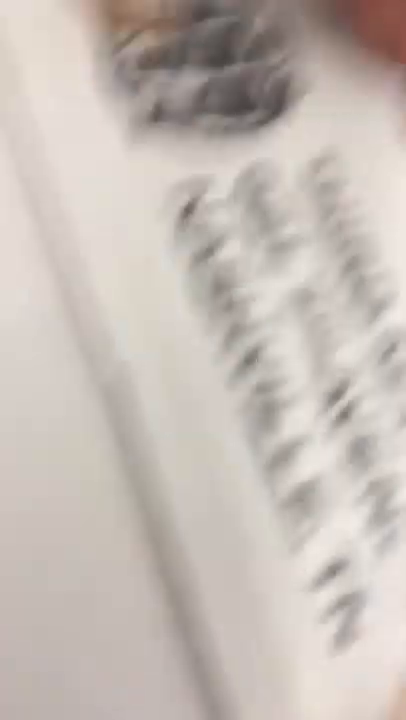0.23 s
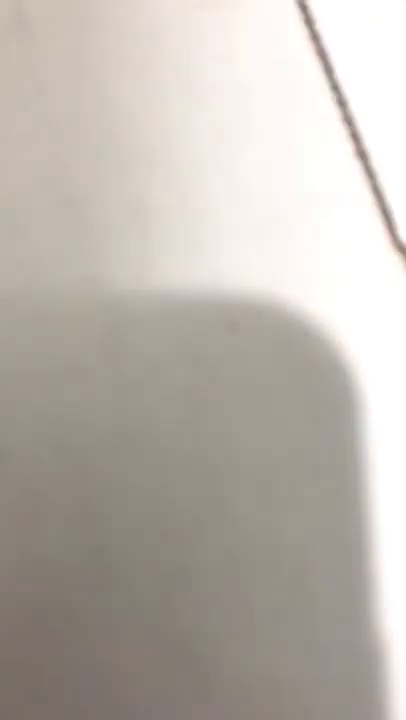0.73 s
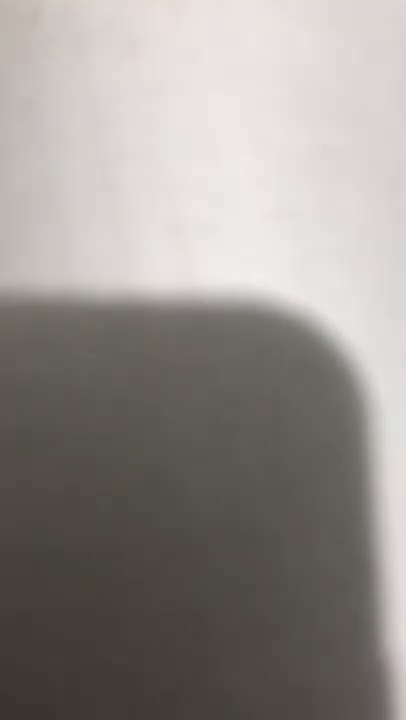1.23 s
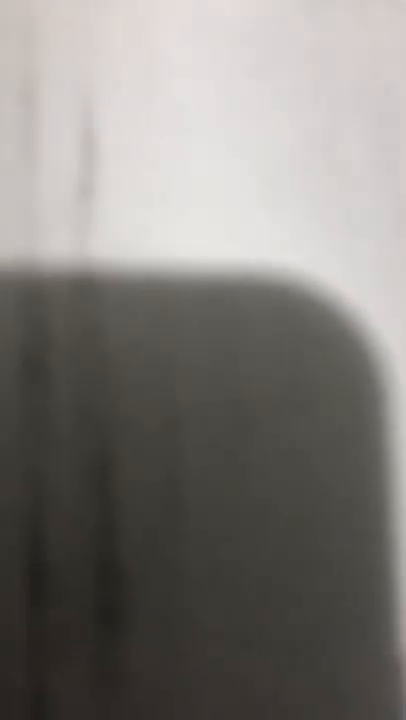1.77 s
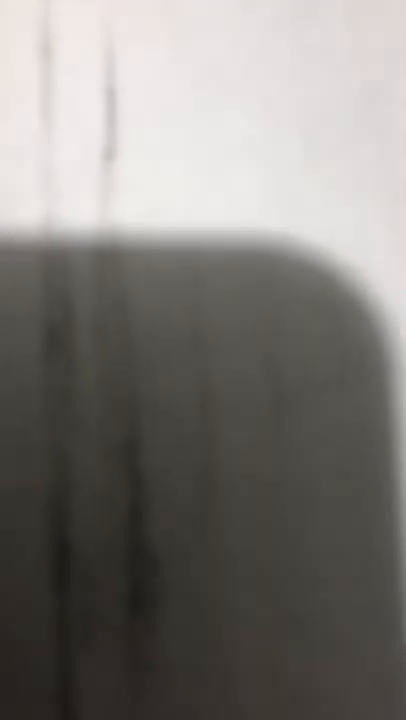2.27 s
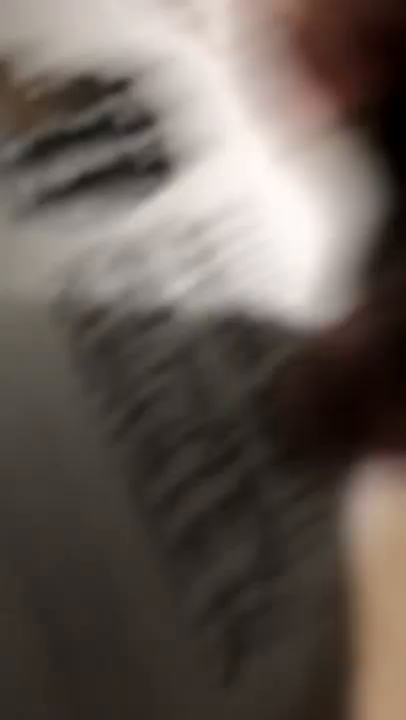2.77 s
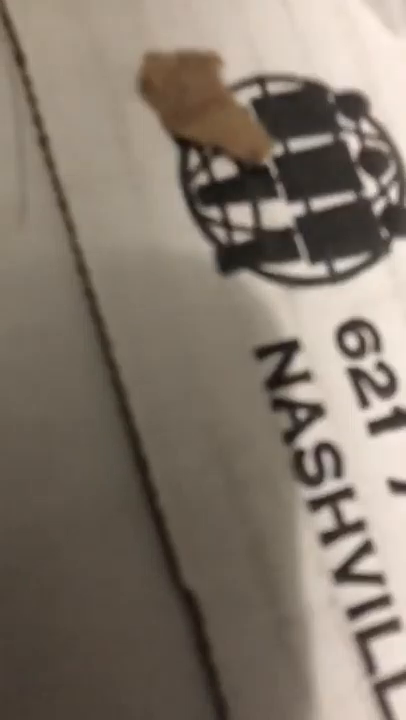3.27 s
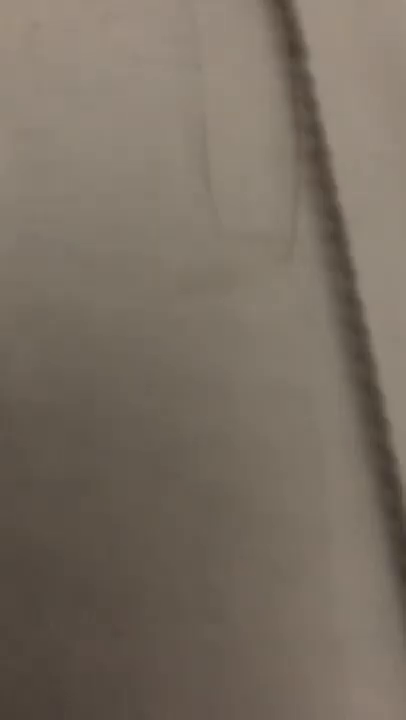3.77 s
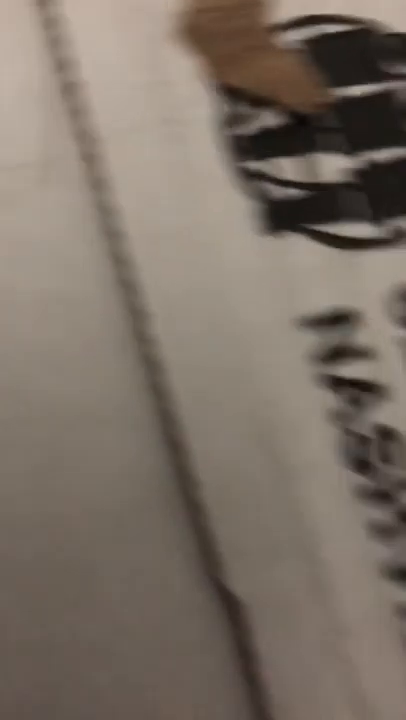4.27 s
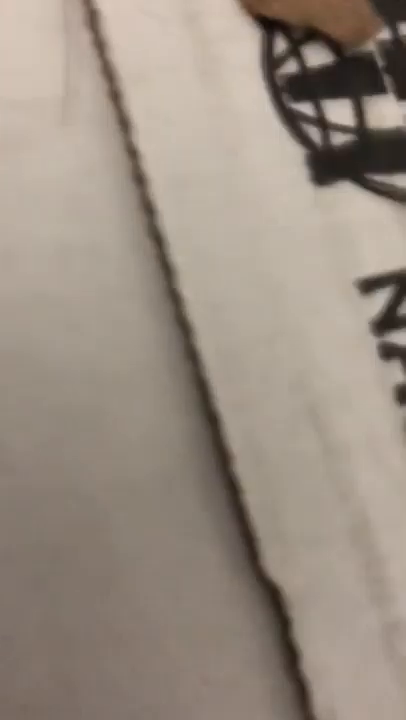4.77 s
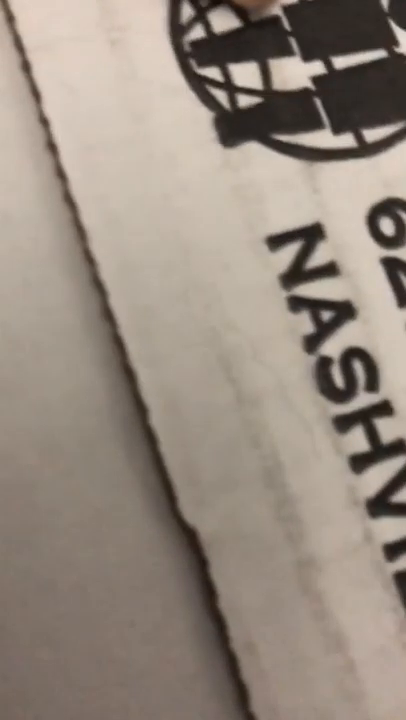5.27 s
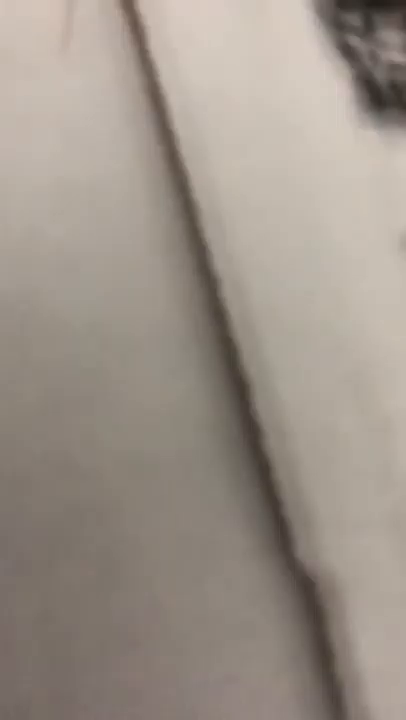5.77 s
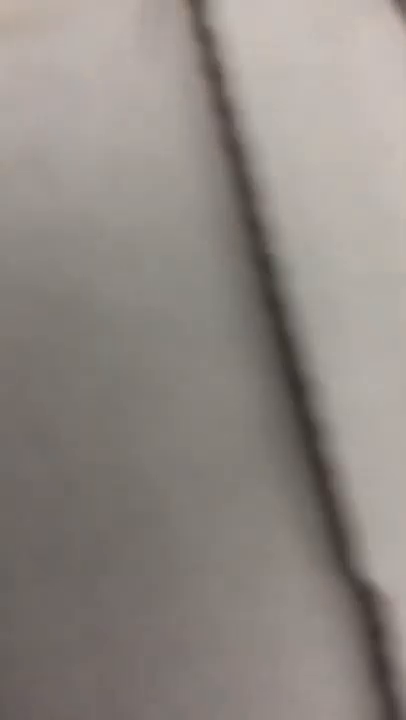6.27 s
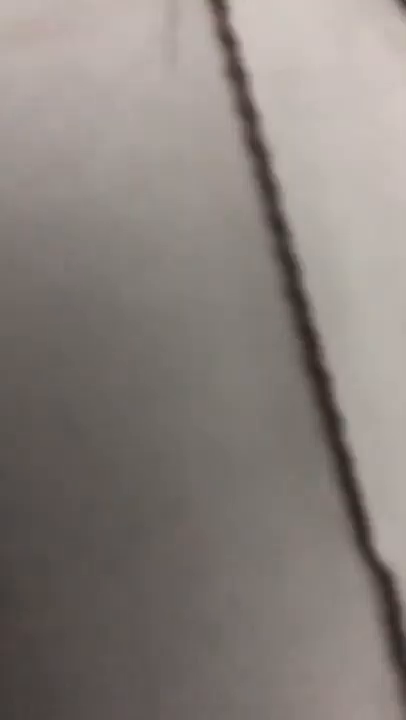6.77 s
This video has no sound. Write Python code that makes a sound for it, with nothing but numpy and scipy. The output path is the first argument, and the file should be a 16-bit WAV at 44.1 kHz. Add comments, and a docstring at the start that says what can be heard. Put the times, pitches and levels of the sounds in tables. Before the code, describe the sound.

Close handling of a cardboard mailer in a small, dry room, over faint steady low-weighted noise. From 0 to 1.3 s fingers scrape softly on card, with a tiny high squeak at 0.1, a low thump at 0.3, dull pops and creaking folds; a very short mid-pitched squeak comes at 1.35. From 1.4 to 2.5 s heavy, hollow thumps dominate, strongest near 1.55, 1.9 and 2.15, mixed with snapping flutes. A loud crack at 2.96 starts the tearing: brief fizzing, crunching rips near 3.1, 3.55 and 3.8 with deep thumps, then a quieter gap with a faint squeak around 4.15. Short pulls rip at 4.5 and 4.8, with cracks and a low rumble. After a lull, creases snap around 5.5 and stronger rips run from 5.6 to 6.8 s, increasingly thin and papery, each with a low panel recoil, then low rumble to about 7 s.

```python
"""A cardboard mailer box is gripped, bent and torn open by hand, close by in a small room.
First fingers rub over the held, rumbling card, with a squeak, dull panel thumps and snapping creases;
from about 3 s the glued flap rips in pulls, fizzing and crunching, and later hangs free and sounds thinner.
Blows and fibre grains cross the card as bending waves, treble first and bass last: short falling chirps.
The squeaks are wavering sine tones, and the steady background is coloured noise."""
import sys
import numpy as np
from scipy import signal
from scipy.fft import rfft, irfft
from scipy.io import wavfile
from scipy.ndimage import uniform_filter1d, minimum_filter1d

SR = 44100
rng = np.random.default_rng(int(sys.argv[2]) if len(sys.argv) > 2 else 0)


def to_wav(sig):
    """Store sig (one row per channel, or 1-D mono) as 16-bit WAV at the path in sys.argv[1].

    Samples outside -1..1 are clipped; the rate is SR.
    """
    pcm = np.clip(np.atleast_2d(sig), -1, 1) * 32767
    pcm = np.round(pcm).astype(np.int16)
    wavfile.write(sys.argv[1], SR, pcm.T)  # frames by channels


N = 309008
TAPS = 4096  # samples in one bending wave
HZ = np.fft.rfftfreq(TAPS, 1 / SR)
TIME = np.arange(N) / SR

# Spectrum of the dull body of a snap, also of the creaking flutes.
# Each row: frequency in Hz, relative level in dB.
SNAP_BODY = [(150, -14.5), (450, -2), (850, 0.5), (1300, 1.5), (1650, -4), (2000, -18.5), (4500, -87)]
# Pulls that rip the paper. Each row: start in seconds, length in seconds, relative level in dB,
# change by the end in dB, ring of the box against the fizz in dB, relative recoil of the panel in dB.
PULLS = [(3.054, 0.068, -33.5, 8, 4, -23.5), (3.53, 0.017, -30.5, -10, 4.5, -34),
         (3.591, 0.038, -28, -10, -1.5, -24), (3.789, 0.059, -24, -12.5, 1.5, -40),
         (3.971, 0.007, -37.5, -7.5, 2, -13.5), (4.475, 0.0078, -15.5, -6, -0.5, -18.5),
         (4.524, 0.043, -23, -2, 4, -10.5), (4.699, 0.044, -37, 6, 0.5, -18),
         (4.777, 0.063, -22, -2.5, 1.5, -28), (5.232, 0.044, -45, 7.5, 8.5, -37),
         (5.562, 0.029, -35, 12.5, 4, -17.5), (5.627, 0.044, -14.5, -1.5, 1.5, 1.5),
         (5.834, 0.036, -19.5, 8.5, 3, 1), (5.909, 0.088, -17, -3.5, 2.5, -1),
         (6.123, 0.0014, -30, 25, 4.5, 1.5), (6.265, 0.097, -21.5, 0.5, 4.5, -3),
         (6.455, 0.2, -20.5, -7, 1, -3), (6.707, 0.069, -22.5, 3.5, 5, -2)]
CATCH_S = .05  # rough spacing of the surges in a pull
CATCH_HALF_S = 0.0079  # half length of one surge, also the attack of the shaking
RECOIL_LAG_S = 0.0175  # from a surge to the panel springing back


def gain_of(db):
    """Decibels to amplitude."""
    return 10 ** (np.asarray(db) / 20)


def evened(x):
    """Scales to rms 1."""
    return x / np.sqrt(np.mean(x ** 2) + 1e-20)


def colour(points, hz=HZ):
    """Gain of a spectrum table, joined on a log-frequency axis and rolled off below 30 Hz."""
    f, db = np.transpose(points)
    curve_db = np.interp(np.log(hz + 1), np.log(f), db)
    return gain_of(curve_db) * hz ** 2 / (hz ** 2 + 30 ** 2)


def level(curve):
    """Gain of a (s, dB) curve at every sample."""
    return gain_of(np.interp(TIME, *np.transpose(curve)))


def wander(hz):
    """Smooth chance of rms 1 that changes about hz times a second."""
    f = np.fft.rfftfreq(N, 1 / SR)
    return evened(irfft(rfft(rng.standard_normal(N)) / (1 + (f / hz) ** 4), N))


def swell(start, length, attack_s, release_s):
    """Gain that grows up to start, holds for length and dies away."""
    before = (start - TIME) / attack_s
    after = (TIME - start - length) / release_s
    return np.exp(-np.clip(np.maximum(before, after), 0, 30))


def below(x, hz):
    """The part of a sound under hz, without delay."""
    return signal.sosfiltfilt(signal.butter(2, hz, fs=SR, output="sos"), x)


def add(mix, start, sound):
    """Mixes a sound in from a sample index on."""
    part = mix[max(start, 0):][:len(sound)]
    part += sound[:len(part)]


def uneven(db):
    """Gain of one spot on the card: its own peaks and dips, a few hundred Hz apart."""
    ripple = uniform_filter1d(uniform_filter1d(rng.standard_normal(len(HZ)), size=17), size=13)
    return gain_of(db * evened(ripple))


def bending_wave(gain, travel_s):
    """A blow after crossing the card, energy 1: delayed by travel_s at 1 kHz, as 1 / sqrt(frequency)."""
    turns = 2 * travel_s * np.sqrt(1000 * HZ)
    wave = irfft(gain * np.exp(-2j * np.pi * turns))
    wave = np.roll(wave, TAPS // 16)  # room for the onset
    wave = wave * np.interp(np.arange(TAPS) / TAPS, [0, .04, .7, 1], [0, 1, 1, 0])
    return wave / np.linalg.norm(wave)


def summit(wave):
    """Sample index at which a wave is strongest."""
    return int(np.argmax(abs(signal.hilbert(wave))))


def grains(gain, effort, per_s, spread_db, travel_s, count=11):
    """Many tiny blows of uneven size, scaled by effort, from a spot that creeps across the card."""
    struck = rng.random(N) < per_s / SR
    size = struck * gain_of(spread_db * np.minimum(rng.exponential(1, N), 3))
    blows = evened(size * rng.choice([-1, 1], N)) * effort
    place = (22 * TIME + 2 * rng.random(N)).astype(int) % count  # 22 spots a second, overlapping
    out = np.zeros(N)
    for k in range(count):
        wave = bending_wave(gain * uneven(3.5), travel_s * rng.uniform(.5, 1.5))
        out += signal.oaconvolve(blows * (place == k), wave)[summit(wave):][:N]
    return out


def catches():
    """A pull catches and surges at even spacing: (s, level dB, ring dB, recoil dB) of every surge."""
    surges = []
    for start, length, db, change_db, box_db, recoil_db in PULLS:
        for u in np.linspace(0, 1, round(length / CATCH_S) + 1):
            surges.append((start + u * length, db + u * change_db, box_db, recoil_db))
    return surges


def sliding(slide_db=5, hiss_hz=2800):
    """Skin catches and slips on the paper grain in uneven scrapes, each stroke with its share of hiss."""
    # Strokes of the fingers. Each row: start in seconds, length in seconds, relative level in dB,
    # hiss against the rub in dB.
    strokes = [(0, 0.01, -33.5, -4), (0.103, 0.059, -40.5, 2.5), (0.276, 0.059, -35.5, -1),
               (0.466, 0.2, -42, -1), (1.005, 0.045, -44, 3.5), (1.7, 0.1, -48, 1), (2.724, 0.21, -38, -2),
               (3.218, 0.11, -50, 2.5)]
    # Spectrum of skin on card. Each row: frequency in Hz, relative level in dB.
    rub_spectrum = [(200, 5.5), (800, -0.5), (1650, 4), (2200, -8.5), (4000, -6.5), (5800, -11.5),
                    (7700, -22.5), (16000, -29)]
    attack_s, release_s = 0.029, 0.045
    unevenness = gain_of(3 * wander(hz=60))
    scrape = grains(colour(rub_spectrum), unevenness, per_s=5000, spread_db=3.2, travel_s=.003)
    rub = below(scrape, hiss_hz)
    hiss = scrape - rub
    out = np.zeros(N)
    for start, length, db, hiss_db in strokes:
        effort = gain_of(db) * swell(start, length, attack_s, release_s)
        out += effort * (rub + gain_of(hiss_db) * hiss)
    return gain_of(slide_db) * out


def flexing(flex_db=3.0, shut_hz=118, open_hz=64, octaves=0.66, creak_db=-17.0):
    """The held box rumbles with many small buckles, deeper as it turns slack; its flutes creak along."""
    # How hard the hands work the box. Each row: time in seconds, relative level in dB.
    grip = [(0, -27), (2.6, -25.5), (3.12, -28), (3.4, -31.5), (4.15, -38.5), (4.65, -18.5), (5.05, -35),
            (7, -29.5)]
    shake_db, shake_release_s = -11, 0.033  # rumble left by a pull, relative to its recoil
    shaken = np.zeros(N)
    for start, length, *_, recoil_db in PULLS:
        shake = swell(start + RECOIL_LAG_S, length, CATCH_HALF_S, shake_release_s)
        shaken += gain_of(recoil_db + shake_db) * shake
    effort = np.hypot(level(grip), shaken)
    slack = np.interp(TIME, [2.7, 5.6], [.3, .9])
    rumble = np.zeros(N)
    for hz, share in (shut_hz, 1 - slack), (open_hz, slack):
        panel = np.exp(-.5 * (np.log2((HZ + 1) / hz) / octaves) ** 2)
        rumble += grains(panel, effort * np.sqrt(share), per_s=105, spread_db=2.4, travel_s=.004)
    creak = grains(colour(SNAP_BODY), effort, per_s=110, spread_db=4.8, travel_s=.004)
    return gain_of(flex_db) * rumble + gain_of(creak_db) * creak


def room_tone(tone_db=-40):
    """Steady indoor background: noise shaped by a fixed spectrum."""
    # Spectrum of the background. Each row: frequency in Hz, relative level in dB.
    tone_spectrum = [(30, 8), (180, 3), (400, -7), (1600, -15), (2500, -33), (4200, -25), (7000, -36.5),
                     (16000, -48)]
    noise = rfft(rng.standard_normal(N)) * colour(tone_spectrum, np.fft.rfftfreq(N, 1 / SR))
    return gain_of(tone_db) * evened(irfft(noise, N))


def squeaks(waver=0.011):
    """Card on card: stick and slip so regular that it becomes a short, wavering tone."""
    # Each row: centre in seconds, half length in seconds, mean pitch in Hz, peak level in dB.
    squeak_rows = [(0.111, 0.0015, 2620, -27), (1.354, 0.0034, 976, -16), (4.145, 0.098, 599, -43.5)]
    wavering_s = np.cumsum(1 + waver * wander(hz=60)) / SR  # time running unevenly
    out = np.zeros(N)
    for s, half_s, hz, db in squeak_rows:
        bump = np.exp(-((TIME - s) / half_s) ** 2)
        out += gain_of(db) * bump * np.sin(2 * np.pi * hz * wavering_s)
    return out


def thumps(travel_s=0.0105, octaves=0.63, peak_db=1, rebound=0.16):
    """A panel moves and rebounds as a low falling chirp; both high and very deep ones glide less."""
    # Thumps of the panels, from buckling and from springing back as the flap tears.
    # Each row: time in seconds, relative peak level in dB,
    # nominal pitch in Hz (the spectrum centres somewhat lower).
    panel_thumps = [(0.204, -26, 380), (0.262, -16.5, 256), (0.31, -0.5, 73.8), (0.482, -13, 101.3),
                    (0.64, -7, 128), (1.045, -11.5, 132), (1.441, 1, 110.3), (1.56, 6.5, 121),
                    (1.712, -8, 127.3), (1.892, 7.5, 124.3), (2.094, -7.5, 151.5), (2.15, 5, 120.1),
                    (2.251, -9.5, 110.2), (2.385, -7.5, 121), (2.805, -8.5, 83.3), (2.98, -4, 66),
                    (3.533, -14.5, 313), (3.545, 2, 98.8), (3.791, -7, 455), (3.804, -3.5, 120),
                    (3.869, 2.5, 97), (4.236, -13, 94.6), (4.594, -11, 458.6), (4.6, -8, 180.3),
                    (5.245, -6.5, 124), (5.307, -4.5, 101)]
    recoil_hz = 97.93  # nominal, varied for each recoil
    rows = list(panel_thumps)
    for s, _, _, db in catches():  # each surge lets the panel spring back
        rows.append((s + RECOIL_LAG_S, db - rng.exponential(1), recoil_hz * rng.uniform(.8, 1.4)))
    out = np.zeros(N)
    for s, db, hz in rows:
        near, far = rng.uniform(.8, 1.3, 2)
        panel = np.exp(-.5 * (np.log2((HZ + 1) / (0.833 * hz)) / octaves) ** 2)
        path = travel_s * min(np.sqrt(100 / hz), (hz / 100) ** 2)
        direct = bending_wave(panel, path * near)
        wave = direct + rebound * bending_wave(panel, 2 * path * far)
        add(out, round(s * SR) - summit(direct), gain_of(db + peak_db) * wave / abs(wave).max())
    return out


def slips():
    """A fold gives way flute after flute: uneven single pops (s, level dB, edge dB)."""
    # Each row: start in seconds, end in seconds, slips per second, relative level in dB,
    # sharp edge against the body in dB before crack_db.
    creaks = [(0.708, 0.805, 114, -26.5, -20), (0.825, 0.868, 74, -23.5, -25.5),
              (1.101, 1.127, 128, -23, -21), (1.4736, 1.54, 49, -20, -20), (1.922, 1.967, 166, -27, -18.5),
              (2.3, 2.34, 63, -24.5, -25), (2.447, 2.497, 52, -18.5, -22), (2.601, 2.635, 72, -23, -16),
              (4.236, 4.256, 163, -30.5, -13), (4.297, 4.34, 132, -16, -17), (5.5178, 5.55, 72, -24.5, -15)]
    jitter, spread_db = .04, 2.2  # share of the gap; unevenness of level in dB
    pops = []
    for start, end, per_s, db, edge_db in creaks:
        for s in np.arange(start, end, 1 / per_s):
            slip_s = s + rng.normal(0, jitter) / per_s
            pops.append((slip_s, db + rng.normal(0, spread_db), edge_db))
    return pops


def snaps(travel_s=.0033, echo=0.38, detour=1.9, body_db=19.5, crack_db=-1, pop_edge_db=-20):
    """Each snap has its own colour; it arrives directly, then more smeared from two edges of the panel."""
    # Stiff outer paper cracking. Each row: time in seconds, relative level in dB,
    # sharp edge against the body in dB before crack_db.
    cracks = [(0.904, -21, -9), (1.214, -24, -11), (1.2602, -23, -5), (1.3772, -14, -11),
              (2.1032, -19, -12), (2.9583, 1, -9), (3.0405, -10, -11), (3.1174, -12, -3), (3.196, -31, 3),
              (3.788, -12, -8), (3.856, -27, 1), (4.217, -33, -2), (4.2798, -26, -10), (4.4699, -12, -1),
              (5.4717, -18, -13), (5.482, -16, -13)]
    # Single flutes popping dully inside the card. Each row: time in seconds, relative level in dB.
    flute_pops = [(0.54, -20), (0.587, -23), (0.943, -18), (1.586, -14), (1.6201, -18), (1.694, -21.5),
                  (2.1302, -11), (2.2076, -19), (2.3554, -17), (2.378, -14), (2.536, -15), (2.55, -21),
                  (2.5685, -23), (2.6988, -15), (2.871, -19), (3.9676, -11), (5.411, -20.5), (5.931, -12),
                  (6.752, -16)]
    # Spectrum of the sharp edge. Each row: frequency in Hz, relative level in dB.
    crack_spectrum = [(1200, -77), (2200, 12), (4200, 16.5), (6000, 7.5), (9000, -4), (16000, -37)]
    pop_top_hz = 10000
    big_top_hz, db_per_octave = 4700, 9  # top of a crack at 0 dB in the table; louder ones are duller
    rows = [(s, db, sharp_db, big_top_hz * 2 ** (-db / db_per_octave)) for s, db, sharp_db in cracks]
    pops = [(s, db, pop_edge_db + rng.normal(0, 3)) for s, db in flute_pops]
    rows += [(*pop, pop_top_hz) for pop in pops + slips()]
    out = np.zeros(N)
    for s, db, sharp_db, top_hz in rows:
        near, far, edge = rng.uniform(.8, 0.91, 3)
        body = colour(SNAP_BODY) * np.clip(HZ / 1500, .2, 1) ** rng.uniform(-.3, 1)
        crack = colour(crack_spectrum) / np.hypot(1, (HZ / top_hz) ** 6)
        sharp = gain_of(sharp_db + crack_db) * crack / np.linalg.norm(crack)
        gain = (body / np.linalg.norm(body) + sharp) * uneven(2)
        path = travel_s * near  # each comes from its own spot
        first_edge = bending_wave(gain, path * detour * far)
        second_edge = bending_wave(gain, path * detour ** 2 * edge)
        arrivals = bending_wave(gain, path) + echo * (first_edge - .5 * second_edge)
        wave = np.linalg.norm(gain) * arrivals
        start = round(s * SR) - summit(bending_wave(body, path))
        add(out, start, gain_of(db + body_db) * wave)
    return out


def tearing(fizz_db=-3, shut_db=-3, ring_db=-3):
    """Paper fibres break in clumps as pulls surge and hold: small ones fizz, large ones crunch in the box."""
    # Fizz while the box is still closed. Each row: frequency in Hz, relative level in dB.
    shut_spectrum = [(1600, -9.5), (2900, -15.5), (4100, 2.5), (4800, -8.5), (5800, -2), (7000, -14.5),
                     (13000, -20.5), (16000, -20)]
    # Fizz once the flap is loose. Each row: frequency in Hz, relative level in dB.
    loose_spectrum = [(1600, -7), (2800, -14), (4500, -2), (5700, -6), (7000, -12.5), (10000, -16.5),
                      (13000, -20.5), (16000, -15)]
    # Crunch ringing in the box. Each row: frequency in Hz, relative level in dB.
    ring_spectrum = [(350, -0.5), (800, -1), (1300, 4), (1720, 2.5), (2100, -14), (3200, -29)]
    opens_s = 5.1  # the flap comes loose
    free_from_s, free_by_s = 5.3, 6.24  # it comes to hang free
    hold_db = -8  # the steadier tearing between surges
    attack_s, release_s = .022, .028
    body_hz, body_held_db, body_free_db = 975, 8, -7  # the box rings fully while held, thinly once free
    top_hz, top_free_db = 9500, -10  # the highest fizz fades as the tear runs away along the flap

    efforts = []
    for s, db, box_db, _ in catches():
        surge = 1 / np.cosh(np.clip((TIME - s) / CATCH_HALF_S, -20, 20))
        efforts.append((gain_of(db) * surge, box_db))
    for start, length, db, change_db, box_db, _ in PULLS:
        hold = swell(start, length, attack_s, release_s)
        efforts.append((gain_of(db + change_db / 2 + hold_db) * hold, box_db))
    fizz = np.sqrt(sum(effort ** 2 for effort, _ in efforts))
    ring = np.sqrt(sum((effort * gain_of(box_db)) ** 2 for effort, box_db in efforts))
    clumps = evened(gain_of(3 * wander(hz=150)))

    shut_effort = fizz * clumps * (TIME < opens_s)
    loose_effort = fizz * clumps * (TIME >= opens_s)
    shut = grains(colour(shut_spectrum), shut_effort, per_s=3000, spread_db=3.5, travel_s=.004)
    loose = grains(colour(loose_spectrum), loose_effort, per_s=7000, spread_db=3.5, travel_s=.004)
    small = gain_of(shut_db) * shut + gain_of(fizz_db) * loose
    large = grains(colour(ring_spectrum), ring * clumps, per_s=750, spread_db=3.6, travel_s=.0036)

    free = np.interp(TIME, [free_from_s, free_by_s], [0, 1])
    top_gain = gain_of(top_free_db * free ** 2)
    small = small + (top_gain - 1) * (small - below(small, top_hz))
    body_gain = gain_of(body_held_db + (body_free_db - body_held_db) * free)
    large = large + (body_gain - 1) * below(large, body_hz)
    return small + gain_of(ring_db) * large


def room(x, t60=0.29, bass_hz=450):
    """A small room answers with a faint, short tail; the bass of the card hardly radiates into it."""
    t = np.arange(SR // 2) / SR
    echoes = rng.standard_normal(len(t)) * (rng.random(len(t)) < .1)  # sparse
    tail = echoes * (t > .004) * gain_of(-60 * t / t60)
    radiated = signal.sosfilt(signal.butter(2, bass_hz, "high", fs=SR, output="sos"), x)
    return gain_of(-19) * signal.oaconvolve(radiated, tail / np.linalg.norm(tail))[:N]


def scene():
    """The box close by, and the room around it."""
    box = sliding() + flexing() + squeaks() + thumps() + snaps() + tearing()
    return (box + room(box) + room_tone())[None]


def record(dry, ceiling=0.89, recovery_db_per_s=120, cutoff_hz=17600):
    """A fast limiter catches the peaks and briefly ducks all else; then the treble is cut off."""
    over_db = 20 * np.log10(np.maximum(abs(dry[0]) / ceiling, 1))
    fall = TIME * recovery_db_per_s
    held_db = np.maximum.accumulate(over_db + fall) - fall  # jumps up, recovers steadily
    duck_db = uniform_filter1d(minimum_filter1d(-held_db, size=64), size=64)
    limited = dry * gain_of(duck_db)
    lowpass = signal.firwin(511, cutoff_hz, window=("kaiser", 9), fs=SR)
    return signal.oaconvolve(limited, lowpass[None], "same")


dry = scene()
out = record(dry)
to_wav(out)
```